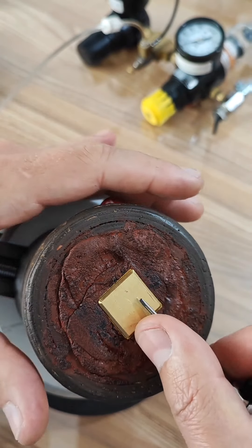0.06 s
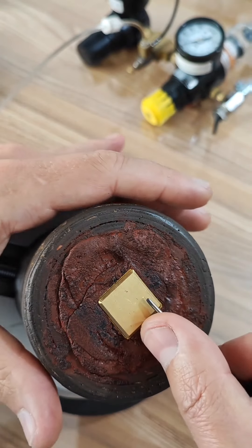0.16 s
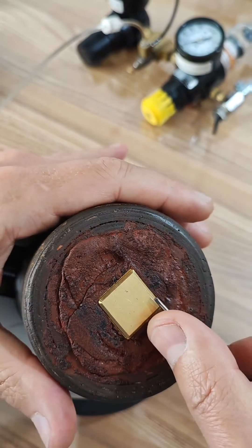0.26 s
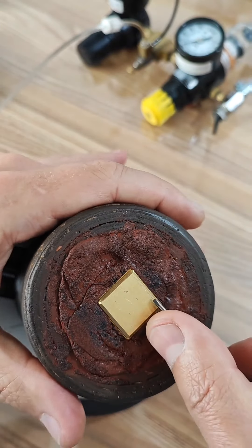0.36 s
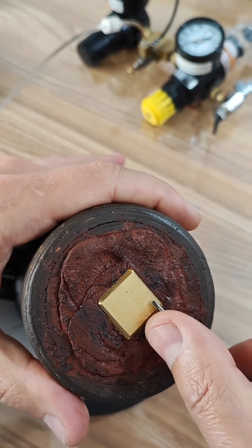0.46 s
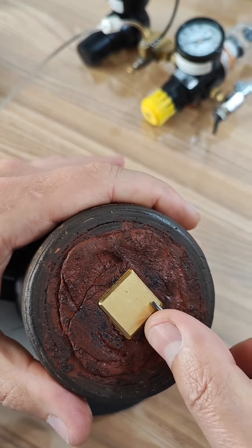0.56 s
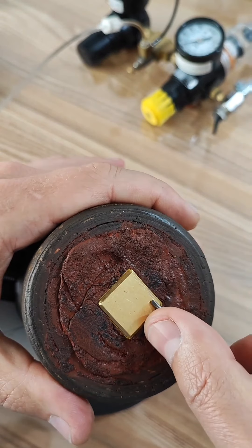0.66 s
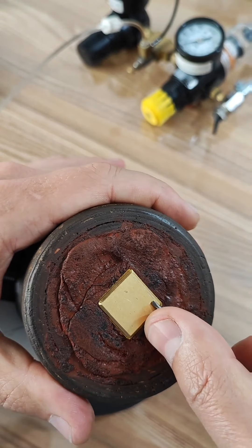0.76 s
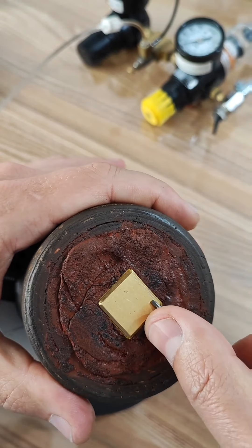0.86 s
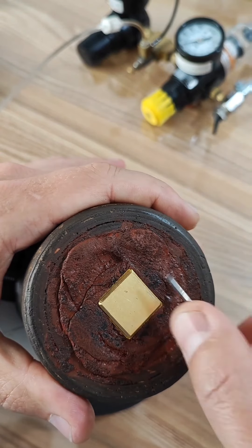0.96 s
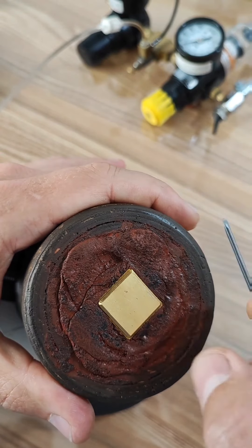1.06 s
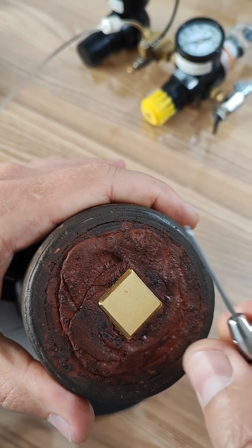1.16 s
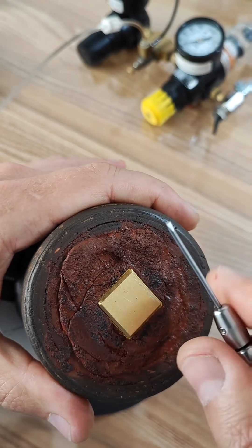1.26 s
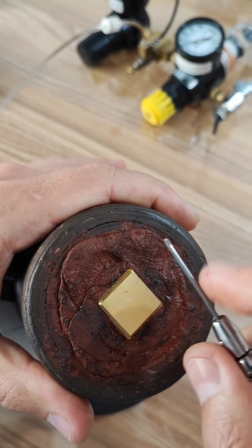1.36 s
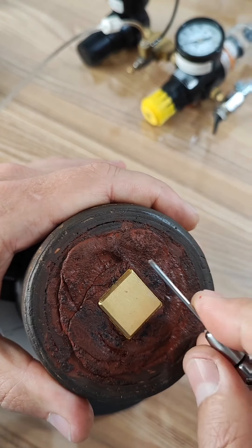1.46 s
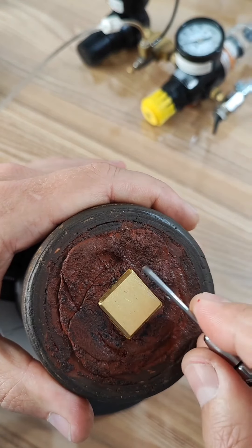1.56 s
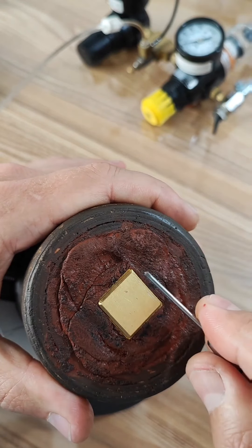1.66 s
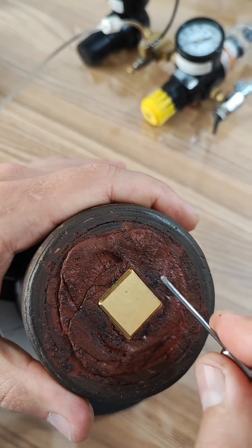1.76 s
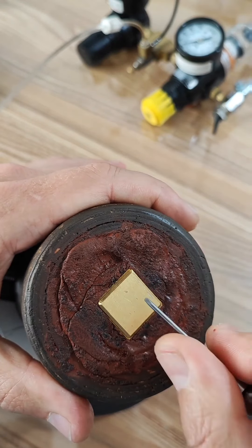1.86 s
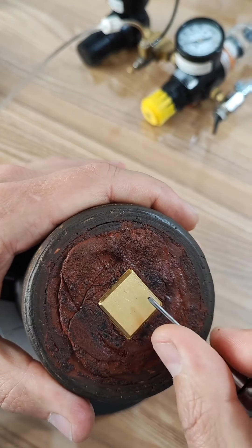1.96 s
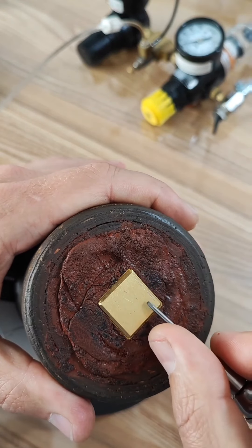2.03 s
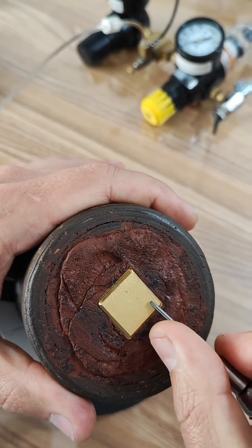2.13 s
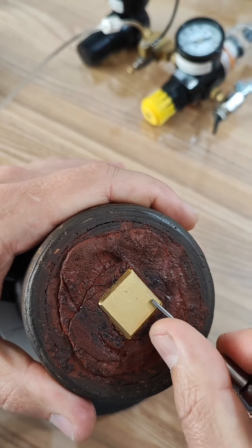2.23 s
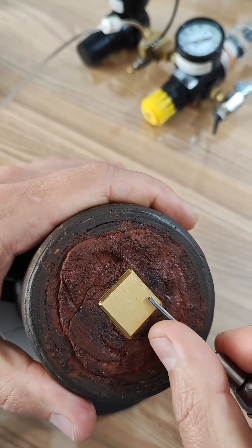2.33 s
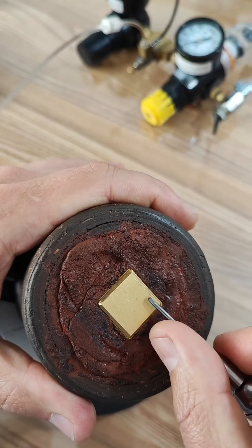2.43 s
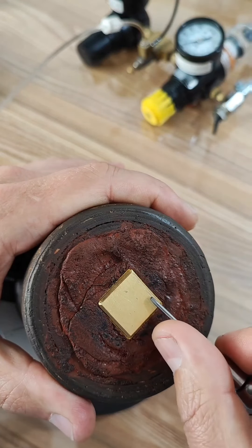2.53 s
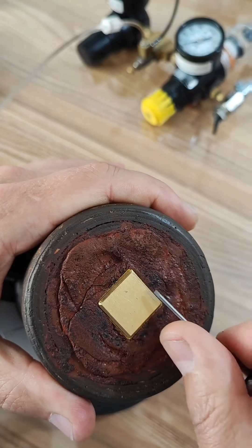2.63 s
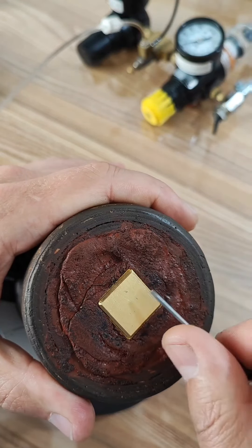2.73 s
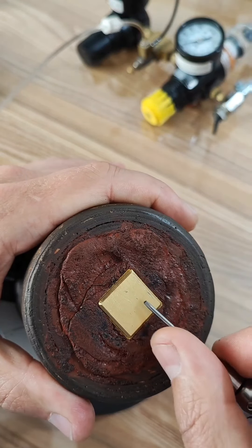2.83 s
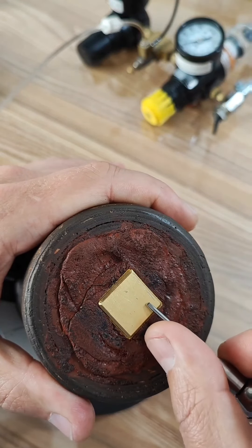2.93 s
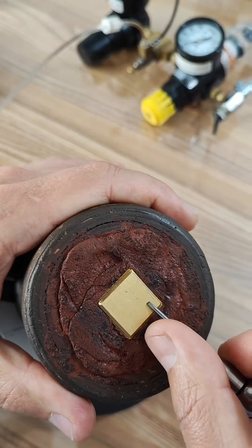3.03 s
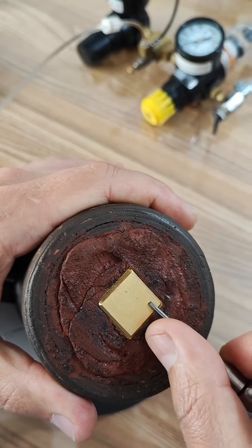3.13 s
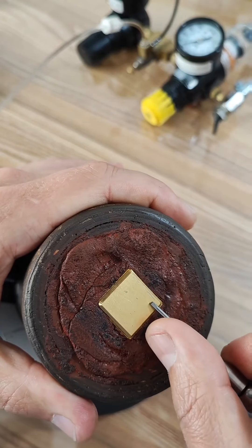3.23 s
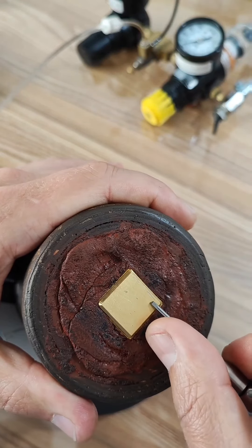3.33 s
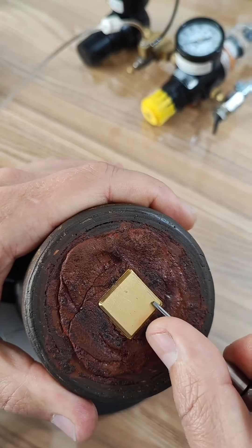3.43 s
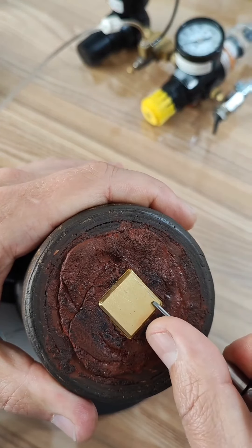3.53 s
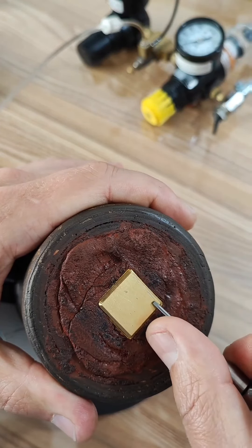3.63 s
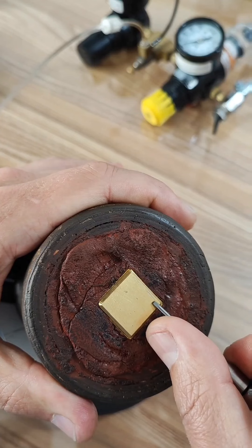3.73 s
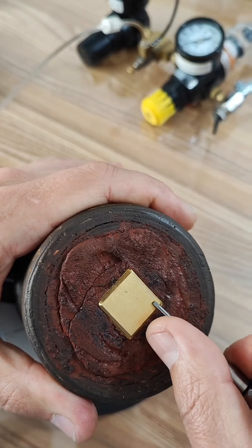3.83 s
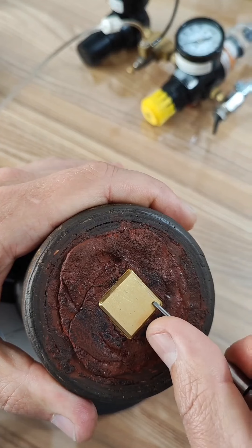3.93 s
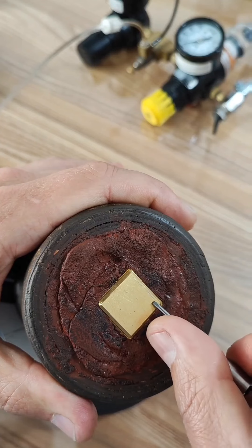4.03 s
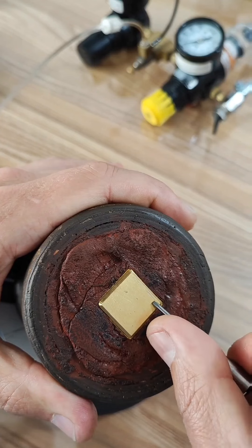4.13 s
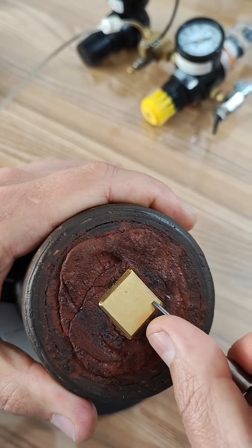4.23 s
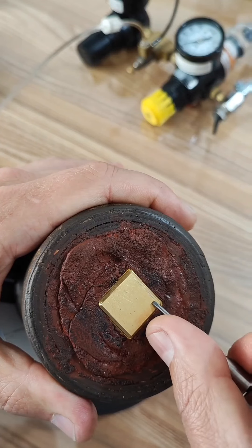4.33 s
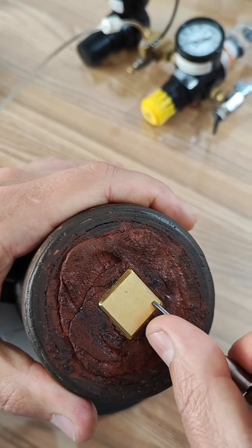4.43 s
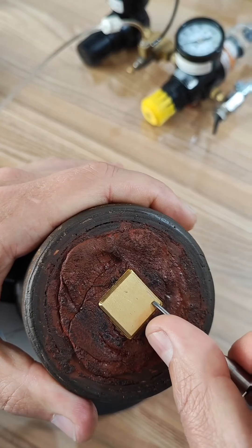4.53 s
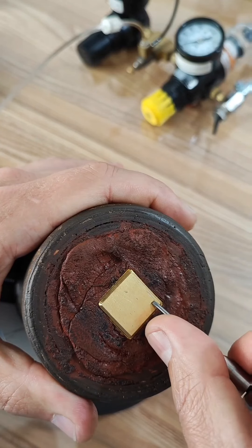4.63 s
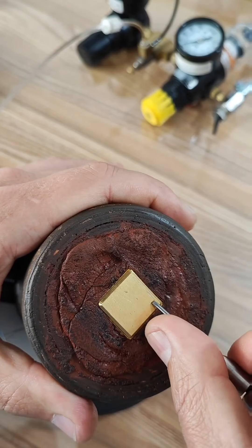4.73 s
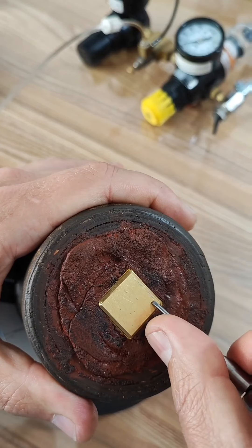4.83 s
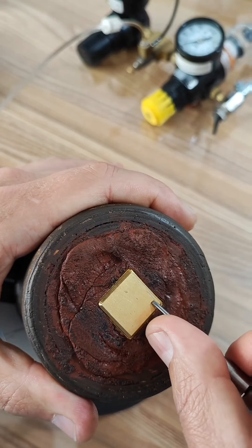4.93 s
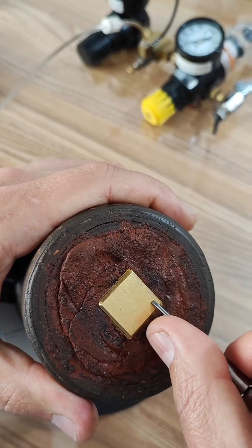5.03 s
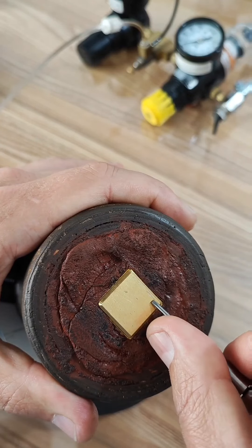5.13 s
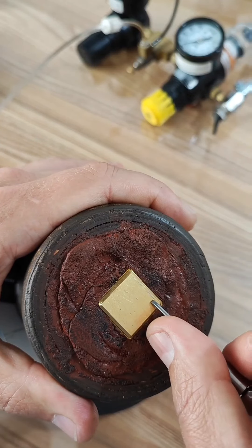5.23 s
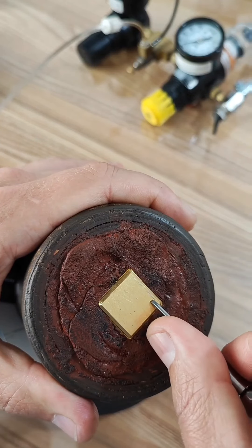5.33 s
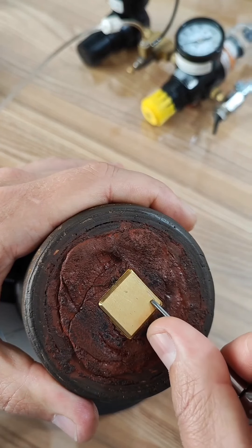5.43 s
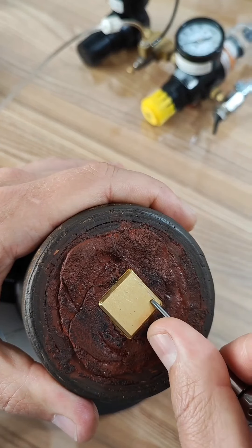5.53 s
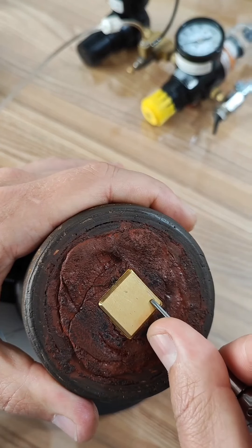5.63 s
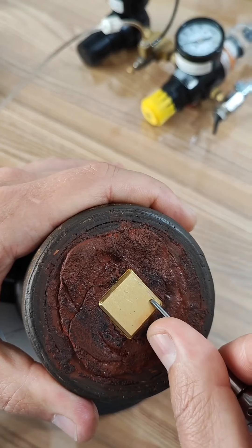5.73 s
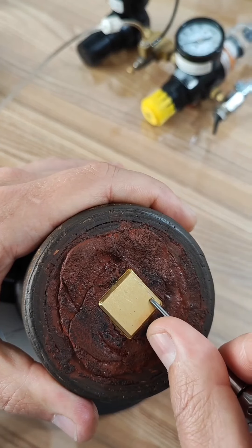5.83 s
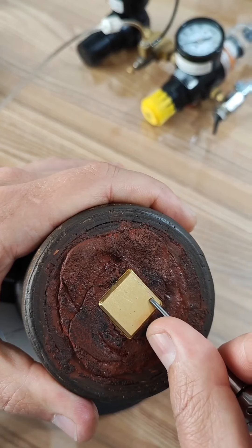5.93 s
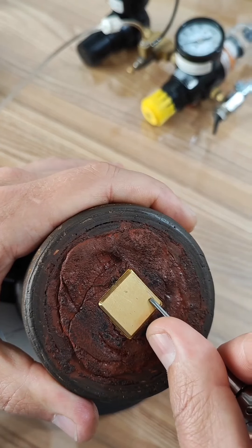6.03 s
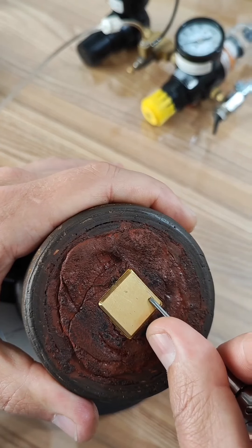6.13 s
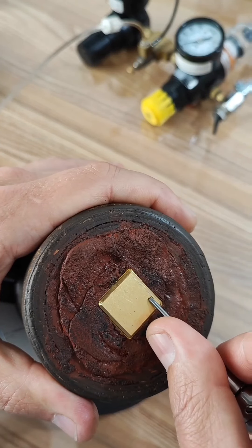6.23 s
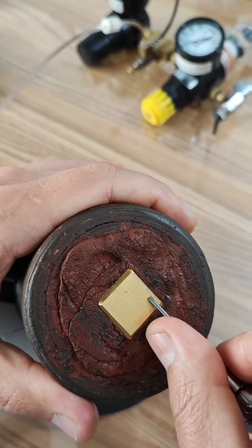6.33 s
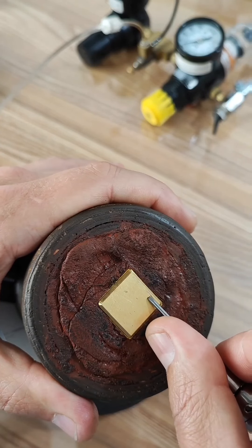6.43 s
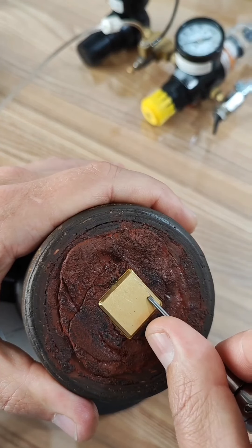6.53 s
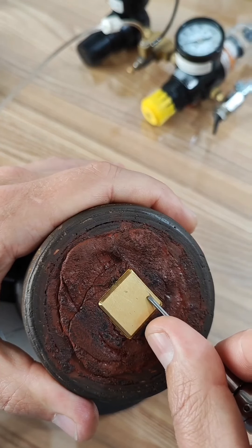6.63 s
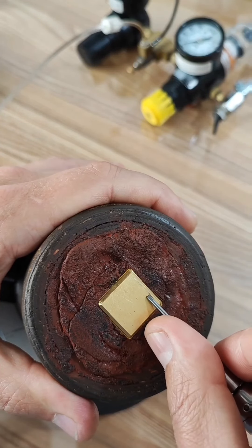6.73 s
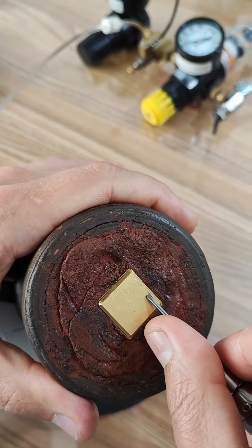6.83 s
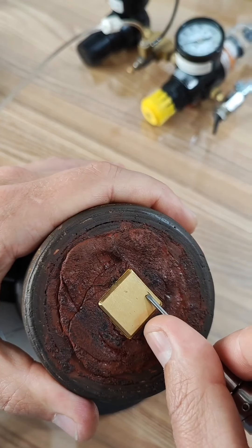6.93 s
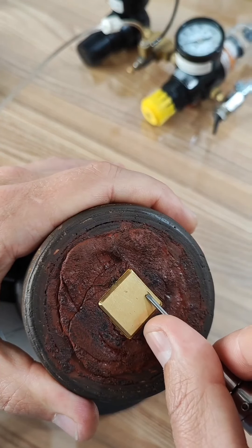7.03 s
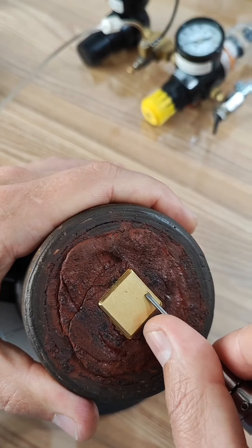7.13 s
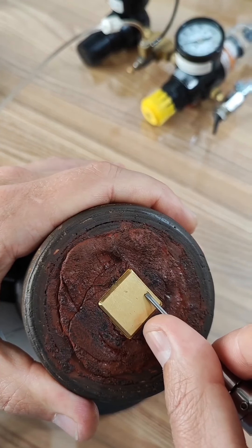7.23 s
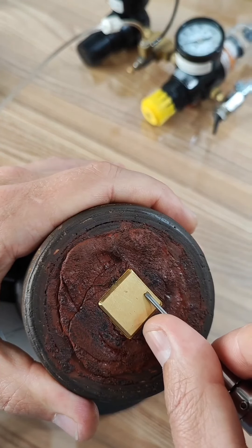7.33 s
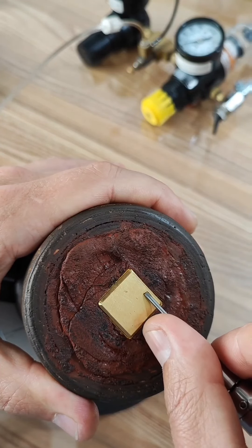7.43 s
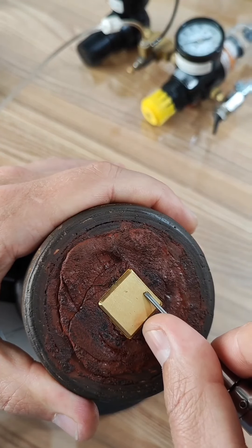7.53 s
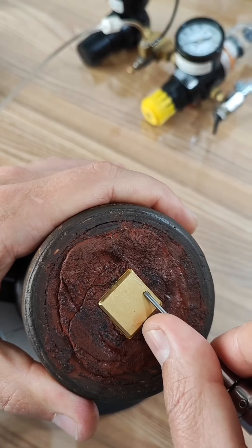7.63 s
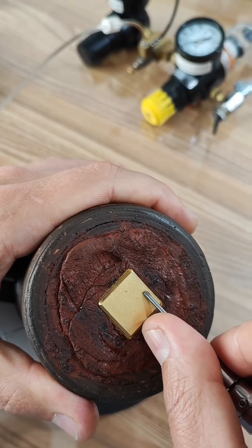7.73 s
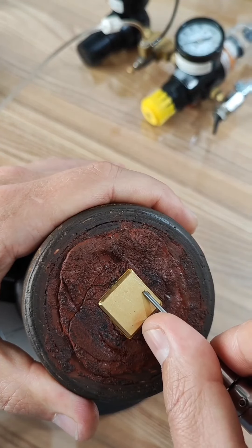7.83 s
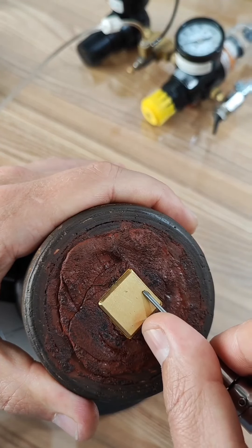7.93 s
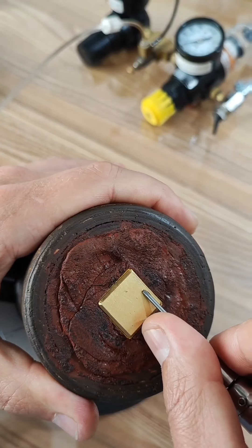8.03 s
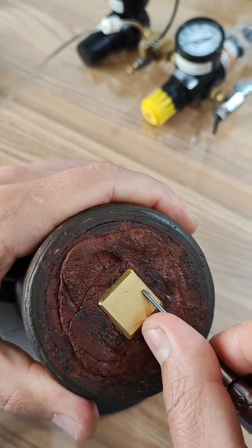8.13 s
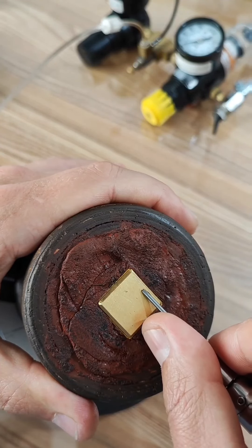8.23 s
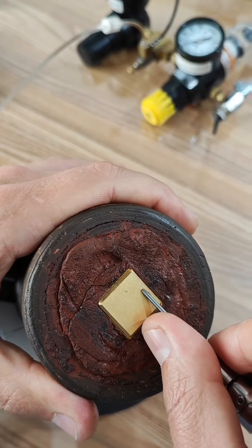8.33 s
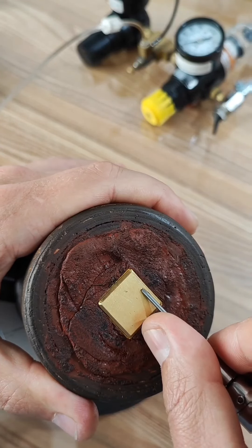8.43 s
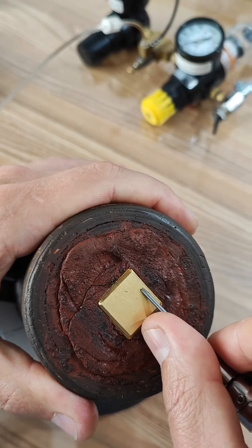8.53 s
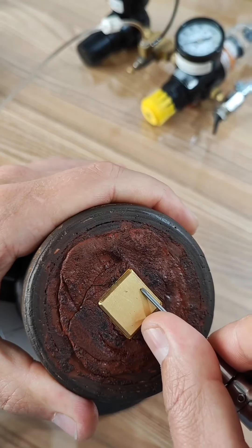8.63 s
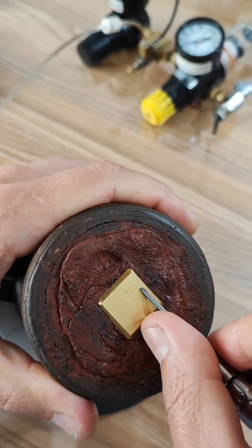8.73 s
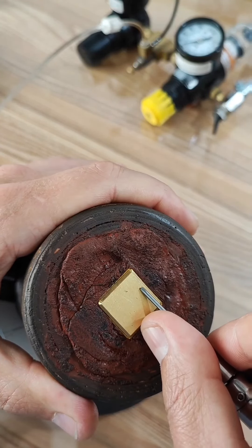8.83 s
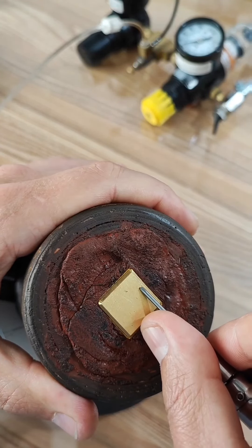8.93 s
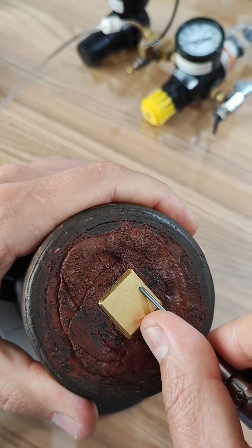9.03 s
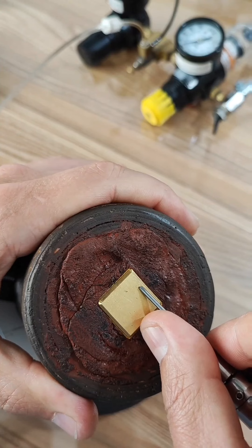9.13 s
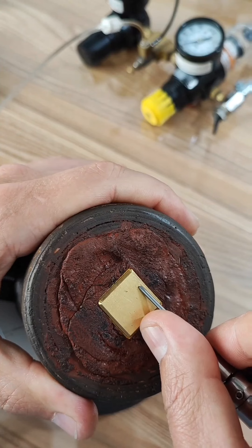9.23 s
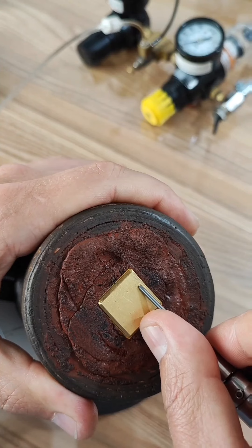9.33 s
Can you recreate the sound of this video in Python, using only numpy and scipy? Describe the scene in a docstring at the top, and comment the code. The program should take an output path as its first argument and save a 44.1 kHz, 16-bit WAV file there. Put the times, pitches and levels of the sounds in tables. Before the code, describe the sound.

In a small, quiet workshop an air pump putters faintly. Close to the microphone, a pneumatic engraving tool gives one short rattling burst and lets out two quick hisses of air. After a pause it starts tapping lightly, then bites into a brass plate with a loud metallic buzz that climbs steadily in speed. A few small chips snap off during the cut.

```python
"""An air-driven engraving tool hammers a small steel blade, the graver, into a brass plate, close by.
It idles and leaks air, gives one short burst, lets out air twice, then hammers ever faster into the metal.
Each blow is a puff of air, a knock on the plate and the bowl of pitch that holds it, and a steel rattle.
Three chips snap off during the cut. Behind it all, an air pump putters in the small workshop."""
import sys
import numpy as np
from scipy import signal
from scipy.io import wavfile
from scipy.ndimage import uniform_filter1d

SR = 44100
rng = np.random.default_rng(int(sys.argv[2]) if len(sys.argv) > 2 else 0)


def pcm_store(signal):
    """Save signal as 16-bit PCM."""
    levels = np.round(np.clip(np.atleast_2d(signal), -1, 1) * 32767)
    wavfile.write(sys.argv[1], SR, levels.astype(np.int16).T)


N = 413216
TIME = np.arange(N) / SR

# How firmly the graver bites into the brass. Each row: time in seconds, share from 0 to 1.
BITE = [(2.3, 0.05), (4.2, 0.04), (4.6, 0.02), (4.95, 0.13), (5.25, 0.89), (7.5, 0.81)]
# A hollow tone that swells, then fades as the cut goes on. Each row: time in seconds, boost in dB.
HOLLOW_BOOST = [(2.3, -2), (4.8, 7), (6.6, 4.5), (8.6, -5)]

def engraving_tool():
    """A piston puffs on every cycle; with the valve open it strikes the graver, which knocks on the brass."""
    pace, pressure = throttle()
    bite = curve(BITE)
    cutting, free = np.sqrt(bite), np.sqrt(1 - bite)  # blend between in the metal and out of it
    body = piston_puffs(pace, pressure) + knocks(pace, pressure, cutting, free)
    body = boost_band(body, HOLLOW_BOOST, band_hz=(537, 766))
    chatter = steel_chatter(pace)
    return body + steel_rattle(chatter, pace, pressure, cutting, free) + graver_ring(chatter, pressure)


# Hammering speed, one list for each press of the throttle. Each row: time in seconds, blows per second.
STROKES = [
    [(1.871, 43.91), (1.893, 47.26), (2.138, 49.22), (2.27, 35.87)],
    [(4.156, 35.04), (4.513, 35.82), (4.64, 39.47), (4.858, 40.5), (5.109, 49.84), (5.527, 52.95),
     (5.749, 57.1), (6.097, 59.47), (6.226, 61.49), (6.416, 62.05), (7.125, 75.36), (7.423, 75.91),
     (8.074, 88.94), (8.257, 86.65), (8.583, 84.49), (8.845, 93.99), (9.37, 98.75)],
]

def throttle(idle_pace=32.6, full_pace=99, valve_lead_s=0.006, lag_s=0.026):
    """Gives the piston's cycles per second and the air pressure (0 to 1) that builds up behind it."""
    pace = np.full(N, idle_pace)
    for stroke in STROKES:
        valve_open = (TIME > stroke[0][0] - valve_lead_s) & (TIME < stroke[-1][0])
        pace = np.where(valve_open, curve(stroke), pace)
    opening = (pace - idle_pace) / (full_pace - idle_pace)
    keep = np.exp(-1 / (lag_s * SR))
    pressure = signal.lfilter([1 - keep], [1, -keep], opening)  # follows the valve a little late
    return pace, pressure * (opening > 0)


def piston_clicks(pace, spread_db):
    """One click for each piston cycle, starting afresh with each press of the throttle."""
    return clicks(pace, spread_db, starts=[stroke[0][0] for stroke in STROKES])


# The tone of one puff. Each row: frequency in Hz, level in dB.
PUFF_TONE = [(30, -22), (68, -8), (84, -1.5), (97, 6.5), (118, 0.5), (160, 4.5), (195, 3.5), (225, -2),
             (300, 13), (380, 3), (450, 6), (540, 0), (620, -22), (800, -39.5), (1200, -49), (3000, -48)]
# Where the puffs, and the pump too, sit between the ears. Each row: frequency in Hz, left minus right in dB.
PUFF_BALANCE = [(60, 0), (200, -2), (380, -3.8), (700, 0)]

def piston_puffs(pace, pressure, idle_db=-61, full_db=-35, return_db=-15):
    """Air puffs out just before each blow, and again more softly as the piston springs back."""
    strength = np.hypot(gain_of(full_db) * pressure ** 0.93, gain_of(idle_db))
    puffs = piston_clicks(pace, spread_db=0.08) * strength
    air = shift(puffs, seconds=-0.00067) + gain_of(return_db) * shift(puffs, seconds=0.00431)
    return through(air, tone_filter(PUFF_TONE, PUFF_BALANCE))


# Plate, bowl and graver ringing together. Each row: pitch in Hz, width in Hz (wider dies sooner),
# left level in dB, right level in dB.
PLATE_NOTES = [(745, 56, -3.5, -54), (823, 47, -8, -4.5), (1151, 148, 3.5, -2.5), (1292, 235, -1, -2.5),
               (1670, 54, -4, -15), (1774, 120, -4.5, -9), (2020, 165, 8, -6.5), (2272, 80, 4, 5),
               (2794, 71, -4, -0.5), (3140, 104, -13, -3.5), (3651, 160, -9.5, -1), (3762, 256, -6, 3.5),
               (4120, 110, -30, -19), (5770, 280, -16, -30), (6510, 190, -38, 0.5), (8700, 200, -25, -35)]
# The ring near 1200 Hz, which dips for a moment in the cut. Each row: time in seconds, boost in dB.
RING_BOOST = [(2.3, -4), (4.4, 9), (5.2, 1), (6.45, 1.5), (7.05, -6.5), (7.8, 1), (8.699, 2.5)]
# The tone of a knock with the graver out of the metal. Each row: frequency in Hz, level in dB.
FREE_KNOCK_TONE = [(300, -104), (600, 5), (850, 0), (1050, 39), (1350, 35), (1600, -26), (1850, 38),
                   (2200, 20), (3000, 21), (5000, -1), (7000, 46), (10000, -26), (15000, -29)]

def knocks(pace, pressure, cutting, free, cutting_db=-1, free_db=-21):
    """Blows make the plate and bowl ring when the graver bites, and only tap lightly when it does not."""
    strength = gain_of(-26.5) * pressure ** 0.72
    blows = piston_clicks(pace, spread_db=0.72) * strength
    ringing = through(blows * cutting, ring(PLATE_NOTES, right_lead_radians=0.96))
    ringing = boost_band(ringing, RING_BOOST, band_hz=(1010, 1540))
    tapping = through(blows * free, tone_filter(FREE_KNOCK_TONE))
    return gain_of(cutting_db) * ringing + gain_of(free_db) * tapping


def steel_chatter(pace, rush_s=0.0011, crack_s=0.0005, chatter_s=0.0019, exhaust_db=-13):
    """A burst of noise for each blow: air rushes in, steel cracks on steel and chatters to a stop."""
    t = np.arange(-600, 601) / SR  # the blow lands at t = 0
    before = 0.17 * np.exp(-abs(t) / rush_s)
    after = np.exp(-abs(t) / crack_s) + 0.26 * np.exp(-abs(t) / chatter_s)
    burst = np.where(t < 0, before, after)
    power = signal.oaconvolve(piston_clicks(pace, spread_db=1.25) ** 2, burst / burst.sum(), "same")
    exhaust = gain_of(exhaust_db) * (pace / pace.max()) ** 2  # hiss fills the gaps as the pace rises
    noise = rng.standard_normal((2, N)) + 0.5 * rng.standard_normal(N)  # partly shared by both ears
    return flicker(np.sqrt(abs(power) + exhaust ** 2) * noise, depth_db=1.5)


# The tone of the rattle in the metal and out of it. Each row: frequency in Hz, level in dB.
CUTTING_RATTLE_TONE = [(600, -21), (900, -10), (1300, -7), (1750, 6), (2200, 6), (2900, -1), (3450, 1),
                       (3850, 5), (4700, -2.5), (5500, 3), (7400, -0.5), (9300, 4.5), (11500, 4.5),
                       (14200, 4), (15500, -10)]
FREE_RATTLE_TONE = [(900, -4.5), (1500, 1.5), (2200, -9.5), (2950, 5), (3800, -2), (5400, 5.5),
                    (6500, -0.5), (8000, 5.5), (9900, -2), (12600, 0.5), (14200, 0), (15500, -50.5)]
# Where the rattle sits between the ears. Each row: frequency in Hz, left minus right in dB.
RATTLE_BALANCE = [(1300, -1), (3000, 2.5), (4400, -4), (6700, 8.5), (8100, -7), (10000, -2.5), (12500, 8.5),
                  (14200, 11.5)]

def steel_rattle(chatter, pace, pressure, cutting, free, entry_s=5.07, entry_width_s=0.17, entry_db=3):
    """Piston meets graver with a sharp snap and a rattle, harder while the point breaks into the brass."""
    reach = np.tanh(pressure / 0.039)  # at very low pressure the piston barely reaches the graver
    entry = gain_of(entry_db * np.exp(-((TIME - entry_s) / entry_width_s) ** 2))
    strength = gain_of(-27) * pressure ** 0.91 * reach * entry
    snap_boost = gain_of(5 * (0.5 - pressure))  # the snap stands out more on slow blows
    snaps = piston_clicks(pace, spread_db=2) * snap_boost
    in_metal = strength * cutting * (gain_of(1) * chatter + gain_of(-9) * snaps)
    in_air = strength * free * (chatter + gain_of(-6) * snaps)
    return (through(in_metal, tone_filter(CUTTING_RATTLE_TONE, RATTLE_BALANCE))
            + through(in_air, tone_filter(FREE_RATTLE_TONE, RATTLE_BALANCE)))


# The graver's own high notes. Each row: pitch in Hz, width in Hz, left level in dB, right level in dB.
GRAVER_NOTES = [(6140, 120, 6, -38), (6600, 670, 8, 0), (7280, 580, -16, 3.5), (7880, 880, -5, 9),
                (8280, 300, -34, -4.5), (6693, 39, 8, 0)]

def graver_ring(chatter, pressure, damping_db=26.5):
    """The thin steel graver rings with each blow, but is muffled when pushed hard into the cut."""
    strength = gain_of(-20) * pressure ** 1.41
    muffling = gain_of(-damping_db * pressure ** 2)
    return through(chatter * strength * muffling, ring(GRAVER_NOTES))


# Chips breaking off. Each row: start in seconds, left level in dB, right level in dB.
CHIPS = [(6.222, -23, -29), (7.098, -22, -28), (8.700, -20, -11)]

def chips(decay_s=0.0011, size=400):
    """Each chip of brass breaks away with one sharp snap."""
    out = np.zeros((2, N))
    fade = np.exp(-np.arange(size) / SR / decay_s)
    for start_s, left_db, right_db in CHIPS:
        add(out, start_s, gain_of([[left_db], [right_db]]) * rng.standard_normal(size) * fade)
    return through(out, tone_filter(CUTTING_RATTLE_TONE))


# Two bursts of air. Each row: start in seconds, level in dB, seconds to rise, seconds to fade by 60 dB,
# level of the seeping in dB compared with the burst.
VENTS = [(2.406, -31, 0.006, 0.53, -46), (2.787, -26, 0.011, 0.57, -17.5)]
# The tone of the air, one list for each burst. Each row: frequency in Hz, level in dB.
VENT_TONES = [
    [(290, -59), (500, -21), (672, -1), (774, -11), (1200, -14), (1520, -10.5), (2050, -10), (2490, -6),
     (2750, -6.5), (4760, -1), (5260, -3.5), (6310, 0.5), (8140, -15), (12800, -11.5), (14500, -33)],
    [(150, -43), (250, -18), (389, -7), (879, -17), (1150, 4), (1210, -6.5), (1460, 0.5), (1790, -9),
     (2090, 0), (3420, -6.5), (6750, -8), (7600, -19), (8560, -15), (13500, -25), (14500, -44)],
]
# Where escaping air sits between the ears. Each row: frequency in Hz, left minus right in dB.
AIR_BALANCE = [(380, -8.5), (1300, 1.5), (2400, 0.2), (4400, -1), (6500, 9.5), (8000, -1), (10000, 0),
               (12500, 10), (14500, 18)]

def vents(seep_s=0.029):
    """Trapped air escapes: it seeps, bursts out as the valve opens, then the pressure drains away."""
    out = np.zeros((2, N))
    t = np.arange(-SR // 10, SR) / SR  # the valve opens at t = 0
    for (start_s, level_db, rise_s, fade_s, seep_db), tone in zip(VENTS, VENT_TONES):
        burst = np.clip(t / rise_s, 0, 1) * gain_of(-60 * t / fade_s)
        seep = gain_of(seep_db) * np.exp(-abs(t) / seep_s)
        air = hiss(tone, AIR_BALANCE)[:, :len(t)]
        add(out, start_s + t[0], gain_of(level_db) * (burst + seep) * air)
    return out


# How loud the leak is. Each row: time in seconds, level in dB.
LEAK_LEVEL = [(1.8, -57.5), (2.38, -52.5), (2.5, -73)]
# The tone of the leak. Each row: frequency in Hz, level in dB.
LEAK_TONE = [(710, -41), (1200, -13), (1590, -20), (2170, -6.5), (2570, -10), (2970, -4.5), (3440, -5),
             (3740, -10), (5440, -2.5), (6700, -5), (7520, -16), (10900, -10.5), (12100, -13), (13500, -20),
             (14500, -11)]

def leak():
    """Air seeps from the tool, and all but stops once the first vent lets it out."""
    return gain_of(curve(LEAK_LEVEL)) * hiss(LEAK_TONE, AIR_BALANCE)


# The tone of one beat of the pump. Each row: frequency in Hz, level in dB.
PUMP_TONE = [(30, -16), (100, -8), (230, -6), (280, 0), (360, 0), (460, -4), (560, -11), (720, -11),
             (900, -23), (1200, -33), (2000, -44), (8000, -60)]

def pump(beats_per_s=38.5, level_db=-59, echo_db=3):
    """An air pump putters evenly, far enough away to carry extra room echo."""
    beats = clicks(np.full(N, beats_per_s), spread_db=0)
    putter = gain_of(level_db) * through(beats, tone_filter(PUMP_TONE, PUFF_BALANCE))
    return putter + gain_of(echo_db) * room_echo(putter)


# Steady hums. Each row: pitch in Hz, level in dB.
STEADY_HUMS = [(99, -72), (200, -70)]
# A deeper hum that comes and goes. Each row: time in seconds, level in dB.
DEEP_HUM_LEVEL = [(0, -77), (2, -69), (3.2, -81), (3.6, -68), (4.8, -62.5), (5.3, -81)]

def hums(deep_hz=56):
    """Three faint, pure, low tones hum under everything."""
    tones = list(STEADY_HUMS) + [(deep_hz, curve(DEEP_HUM_LEVEL))]
    return sum(np.sqrt(2) * gain_of(db) * np.sin(2 * np.pi * (hz * TIME + rng.random()))
               for hz, db in tones)


# How loud the hand on the bowl is. Each row: time in seconds, level in dB.
HAND_LEVEL = [(0, -75), (.85, -62), (1.15, -57), (2, -65.5), (9.37, -96)]
# The tone of its rumble. Each row: frequency in Hz, level in dB.
HAND_TONE = [(15, -5), (55, -11), (110, -13.5), (250, -19), (1000, -61)]

def hand_rumble():
    """A hand shifts on the bowl and makes a low rumble, the same in both ears."""
    return gain_of(curve(HAND_LEVEL)) * hiss(HAND_TONE)[0]


# The tone of the quiet workshop. Each row: frequency in Hz, level in dB.
WORKSHOP_TONE = [(12, -38), (20, -21), (151, -10), (189, -11.5), (229, -13.5), (319, -8.5), (733, -19),
                 (940, -23.5), (4200, -39), (6530, -46), (8860, -41), (13100, -50), (15000, -54)]

def workshop_air(level_db=-60.5):
    """Still workshop air makes a soft, steady rush."""
    air = hiss(WORKSHOP_TONE)
    return gain_of(level_db) * unit_level(air + 0.074 * air[::-1])  # each ear gets a little of the other


# How long the echo lasts. Each row: frequency in Hz, seconds to fade by 60 dB.
ECHO_FADE = [(150, 1), (600, 0.77), (2000, 0.33), (6000, 0.051), (14000, 0.2)]
# How alike the echo is in both ears. Each row: frequency in Hz, likeness from 0 to 1.
ECHO_LIKENESS = [(300, .99), (600, .6), (1200, .1), (4000, 0)]
# How strong the echo is. Each row: frequency in Hz, level in dB.
ECHO_LEVEL = [(60, -17), (300, -10), (700, -10), (2000, -5.5), (4500, -7), (7000, -7.5), (10000, -17),
              (14000, -5)]

def room_echo(sound, first_echo_s=0.0017):
    """Sound bounces off the bench and walls in a dense tail, each band dying at its own speed."""
    bounces = rng.standard_normal((2, SR // 2)) * (np.arange(SR // 2) > first_echo_s * SR)
    hz, t, (left, unrelated) = signal.stft(bounces, SR, nperseg=512)
    fade_s, likeness, level_db = (value_at(table, hz)[:, None]
                                  for table in (ECHO_FADE, ECHO_LIKENESS, ECHO_LEVEL))
    right = likeness * left + np.sqrt(1 - likeness ** 2) * unrelated
    decay = np.log(1000) / fade_s
    fade = gain_of(level_db) * np.sqrt(2 * decay / SR) * np.exp(-decay * t)
    tail = signal.istft(np.array([left, right]) * fade, SR, nperseg=512)[1]
    return through(sound, tail)


def clicks(pace, spread_db, starts=()):
    """One click a cycle, its size varying at random by about spread_db. Each start begins a new cycle."""
    cycles = np.cumsum(pace) / SR
    for start_s in starts:
        first = round(start_s * SR)
        cycles[first:] += 1 - cycles[first] % 1 + 1e-9  # jump just past the next whole cycle
    hits = np.flatnonzero(np.diff(np.floor(cycles)))
    train = np.zeros(N)
    train[hits] = np.sqrt(SR / pace[hits]) * gain_of(spread_db * rng.standard_normal(len(hits)))
    return train


def ring(notes, right_lead_radians=0, rise_s=0.00008, size=2048):
    """Metal rings after one blow as a sum of fading notes; neighbouring notes swing opposite ways."""
    t = np.arange(size) / SR
    phase = np.array([[0], [right_lead_radians]])
    sound = np.zeros((2, size))
    for k, (hz, width_hz, left_db, right_db) in enumerate(notes):
        fade = width_hz * gain_of([[left_db], [right_db]]) * np.exp(-np.pi * width_hz * t)
        sound += (-1) ** k * fade * np.sin(2 * np.pi * hz * t + phase)
    sound *= 1 - np.exp(-t / rise_s)
    bass_cut = signal.butter(2, 600, "high", fs=SR, output="sos")  # small parts give off no bass
    return unit_energy(signal.sosfilt(bass_cut, sound))


def flicker(sound, depth_db, size=512):
    """Makes random patches of high and low sound swell and fade from blow to blow."""
    spectrum = signal.stft(sound, nperseg=size)[2]
    patches = uniform_filter1d(rng.standard_normal(spectrum.shape[1:]), size=11, axis=0)  # over pitch
    patches = unit_level(uniform_filter1d(patches, size=7, axis=1))  # over time
    return signal.istft(spectrum * gain_of(depth_db * patches), nperseg=size)[1][:, :N]


def boost_band(sound, boost, band_hz):
    """Turns one band of frequencies up or down over time."""
    band = signal.sosfiltfilt(signal.butter(2, band_hz, "band", fs=SR, output="sos"), sound)
    return sound + (gain_of(curve(boost)) - 1) * band


def tone_filter(tone, balance=((100, 0), (1000, 0)), size=4096):
    """A stereo filter that gives a sound this tone and left-right balance."""
    hz = abs(np.fft.fftfreq(size, 1 / SR))
    level_db = value_at(tone, hz) + np.array([[0.5], [-0.5]]) * value_at(balance, hz)
    spectrum = np.exp(np.conj(signal.hilbert(np.log(gain_of(level_db)))))  # nothing sounds before the hit
    return unit_energy(np.fft.ifft(spectrum).real[:, :size // 2])


def hiss(*tone_and_balance):
    """Stereo noise with the given tone and, if given, balance."""
    return through(rng.standard_normal((2, N)), tone_filter(*tone_and_balance))


def through(sound, response):
    """Plays a sound through a stereo filter, ring or echo."""
    return signal.oaconvolve(np.atleast_2d(sound), response, axes=1)[:, :N]


def gain_of(db):
    """Turns decibels into a number to multiply by."""
    return 10 ** (np.asarray(db) / 20)


def unit_level(sound):
    """Scales a sound to an average power of 1."""
    return sound / np.sqrt(np.mean(sound ** 2) + 1e-20)


def unit_energy(response):
    """Scales a stereo response to an average energy of 1 per ear."""
    return response / np.sqrt(np.sum(response ** 2) / 2)


def value_at(table, hz):
    """Looks up frequencies in a table, sliding between its rows on a musical (log) scale."""
    row_hz, values = np.transpose(table)
    return np.interp(np.log(hz + 1), np.log(row_hz + 1), values)


def curve(table):
    """Joins rows of time and value with straight lines, giving a value for every sample."""
    return np.interp(TIME, *np.transpose(table))


def add(mix, start_s, sound):
    """Mixes a stereo sound in at its start time."""
    part = mix[:, round(start_s * SR):][:, :sound.shape[1]]
    part += sound[:, :part.shape[1]]


def shift(sound, seconds):
    """Moves a sound later (earlier if negative), wrapping round at the ends."""
    return np.roll(sound, round(seconds * SR), axis=-1)


def scene():
    """The tool and its air up close, with the pump and the workshop behind."""
    near = engraving_tool() + chips() + vents() + leak()
    return near + room_echo(near) + pump() + hums() + workshop_air() + hand_rumble()


def record(dry, cutoff_hz=14450):
    """Cuts away the very highest treble."""
    treble_cut = signal.firwin(161, cutoff_hz, window=("kaiser", 8), fs=SR)
    return signal.oaconvolve(dry, treble_cut[None], "same")


dry = scene()
out = record(dry)
pcm_store(out)
```